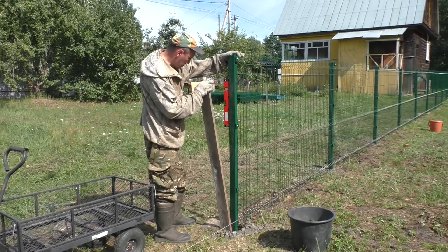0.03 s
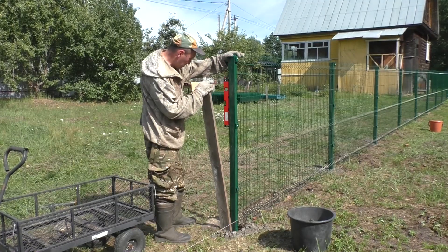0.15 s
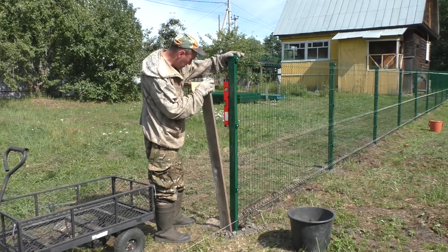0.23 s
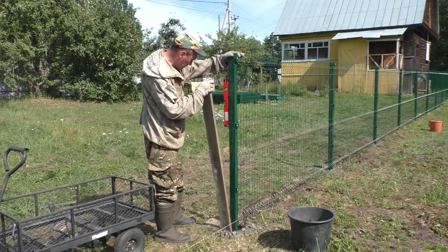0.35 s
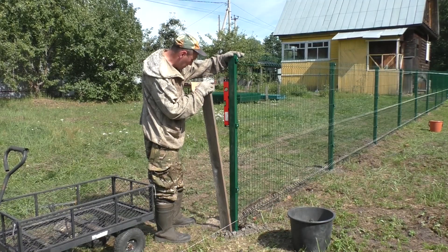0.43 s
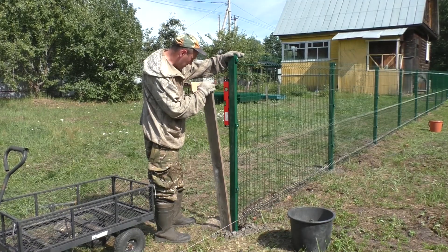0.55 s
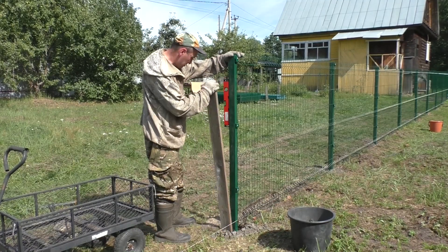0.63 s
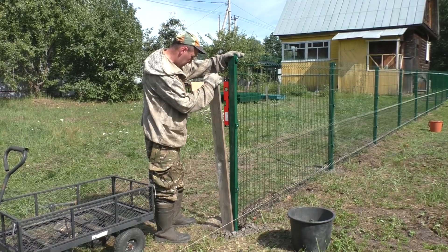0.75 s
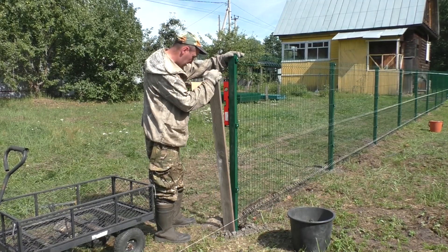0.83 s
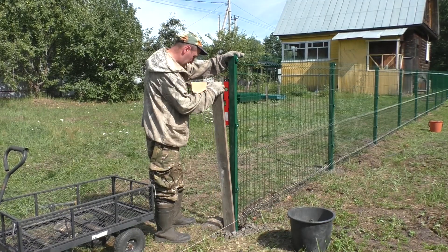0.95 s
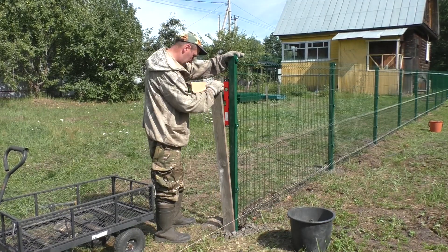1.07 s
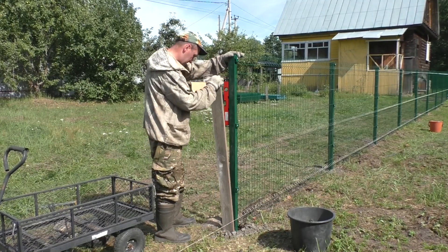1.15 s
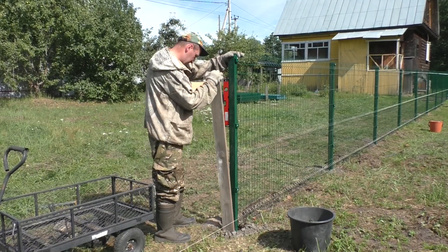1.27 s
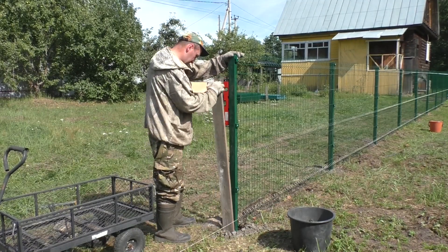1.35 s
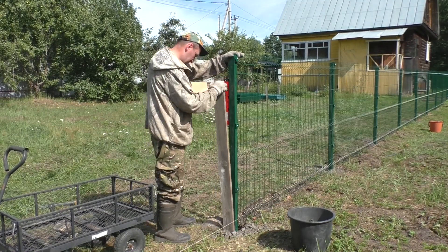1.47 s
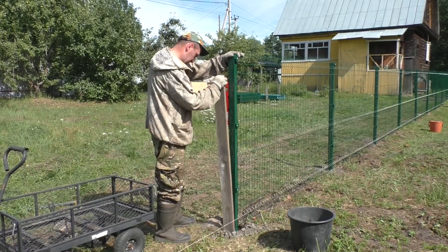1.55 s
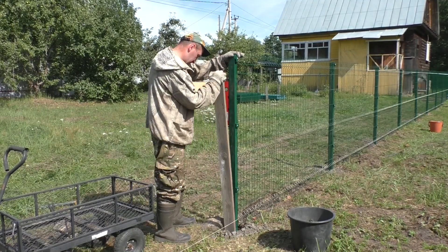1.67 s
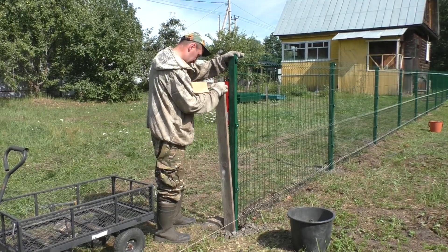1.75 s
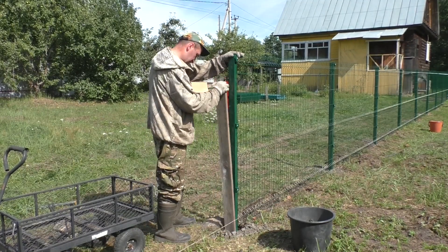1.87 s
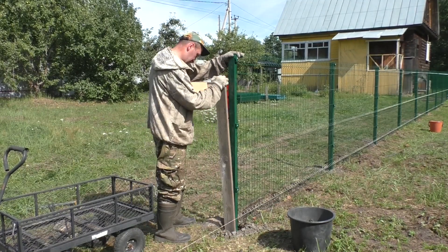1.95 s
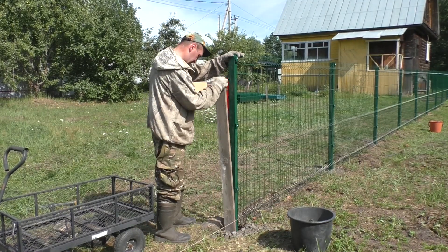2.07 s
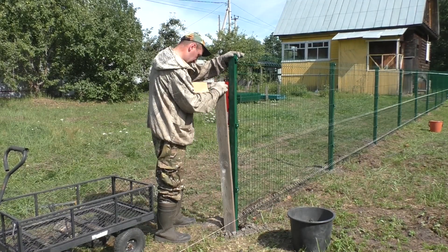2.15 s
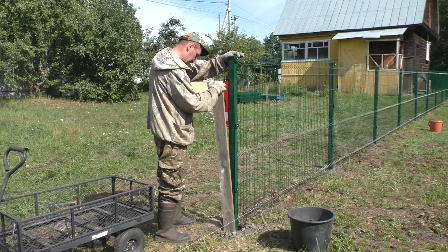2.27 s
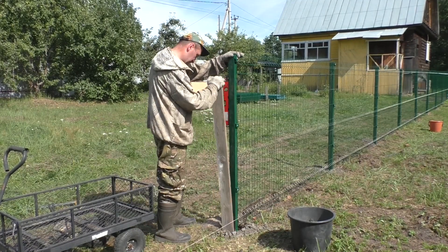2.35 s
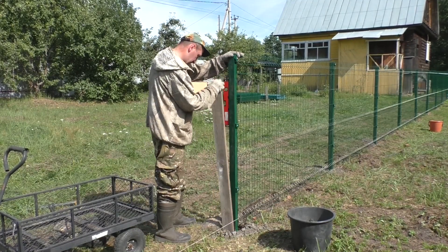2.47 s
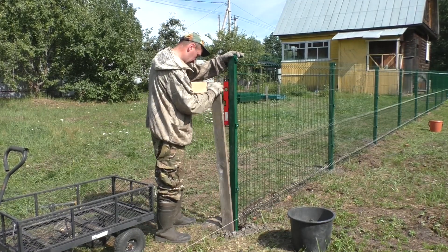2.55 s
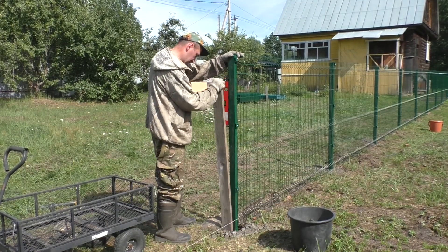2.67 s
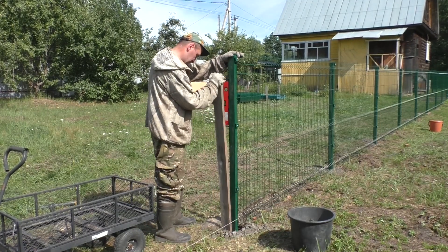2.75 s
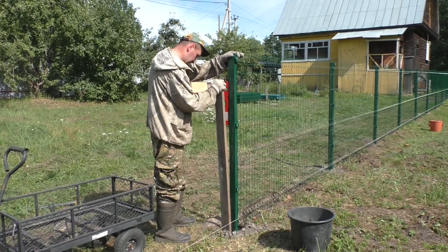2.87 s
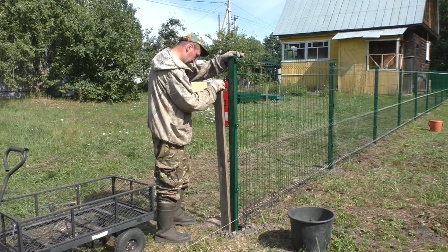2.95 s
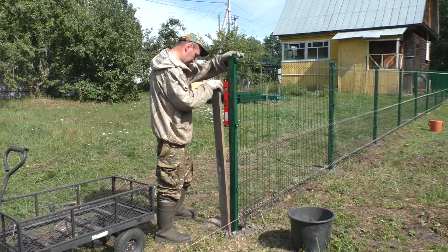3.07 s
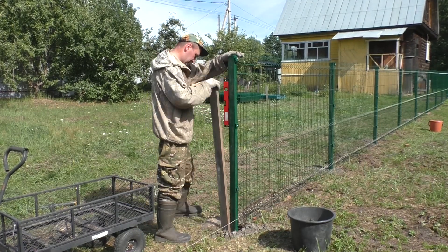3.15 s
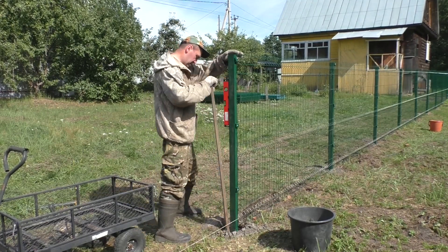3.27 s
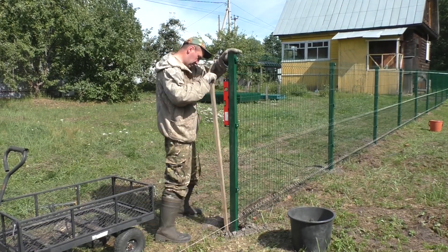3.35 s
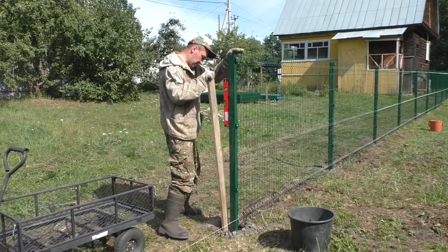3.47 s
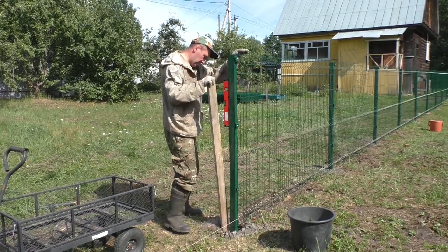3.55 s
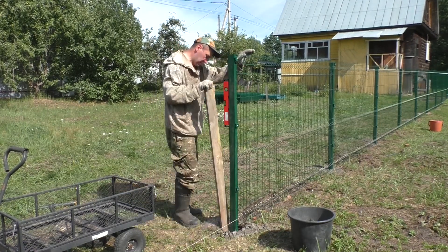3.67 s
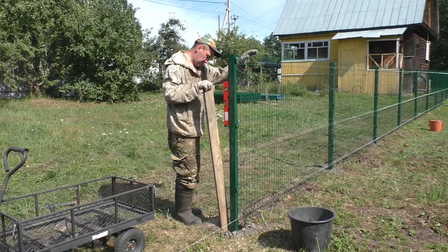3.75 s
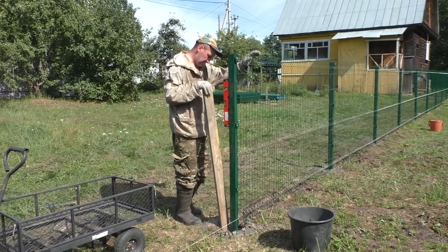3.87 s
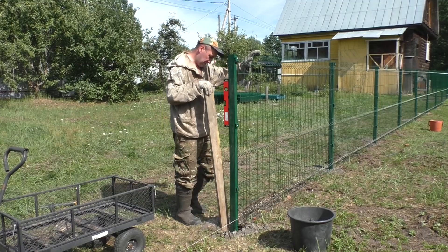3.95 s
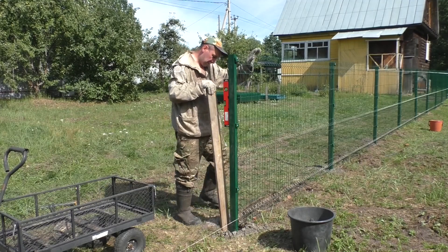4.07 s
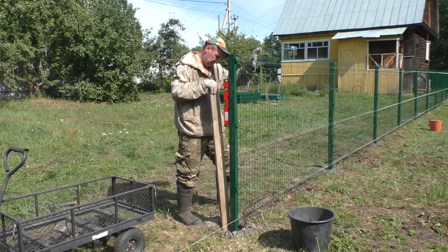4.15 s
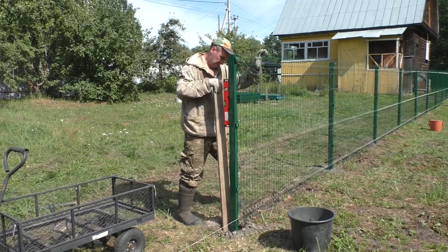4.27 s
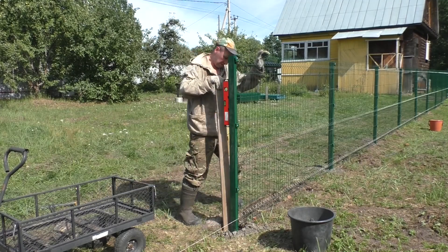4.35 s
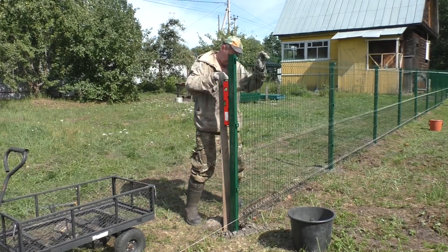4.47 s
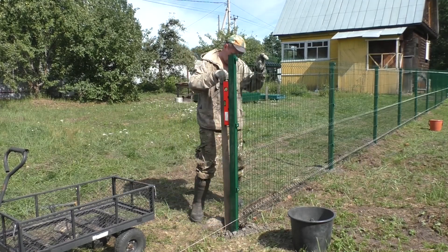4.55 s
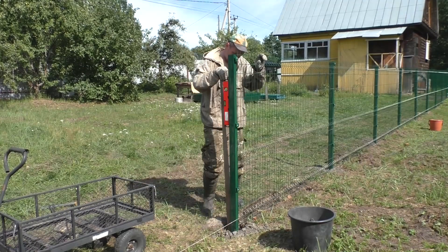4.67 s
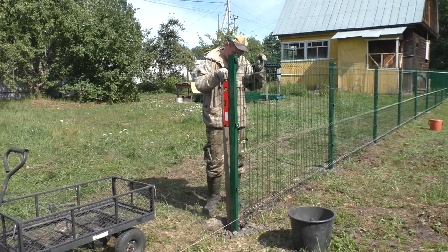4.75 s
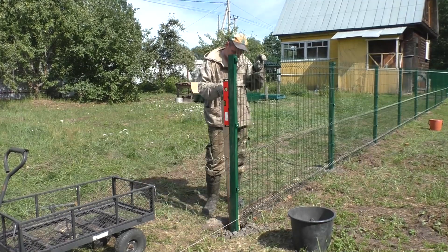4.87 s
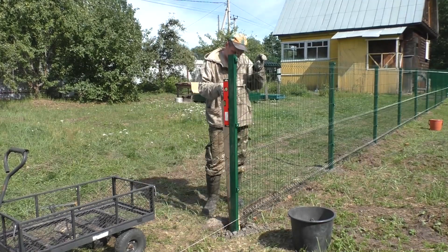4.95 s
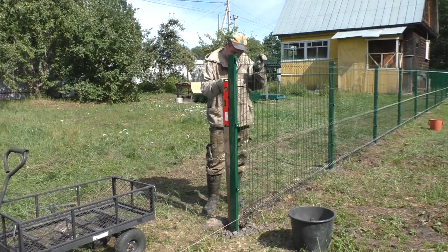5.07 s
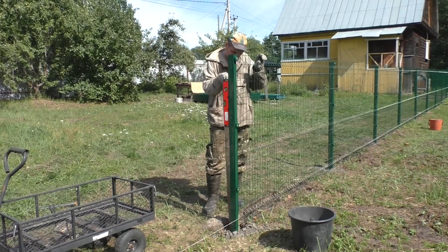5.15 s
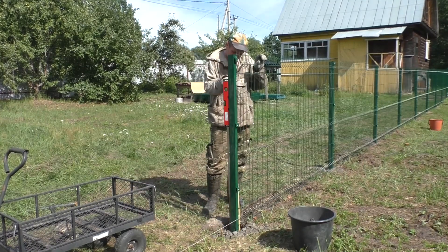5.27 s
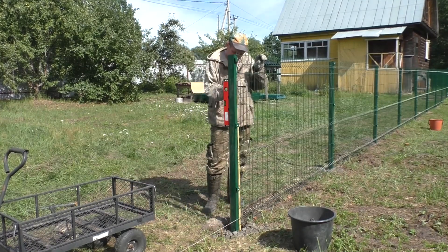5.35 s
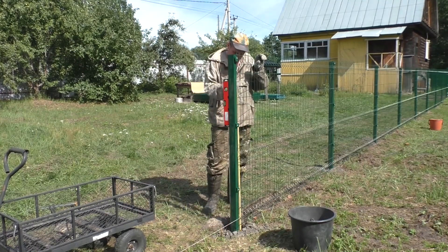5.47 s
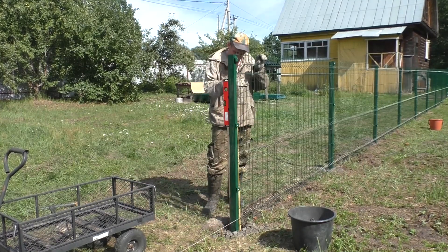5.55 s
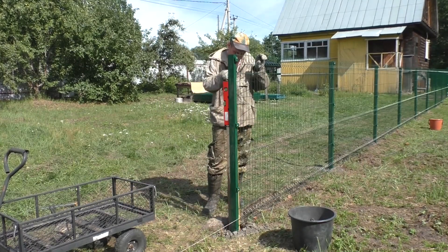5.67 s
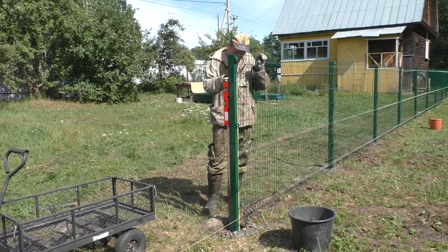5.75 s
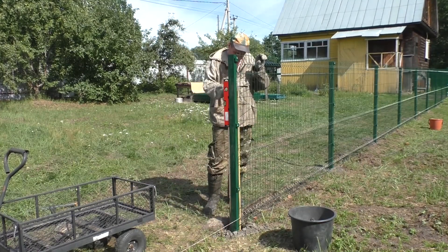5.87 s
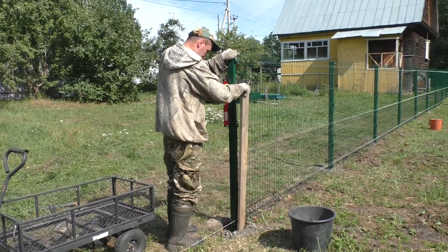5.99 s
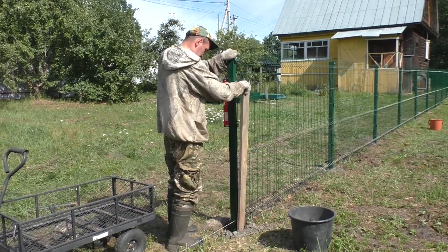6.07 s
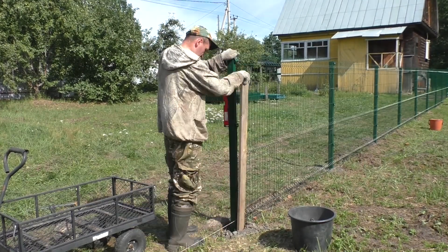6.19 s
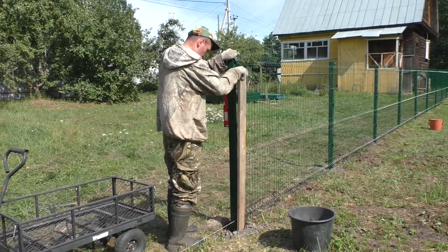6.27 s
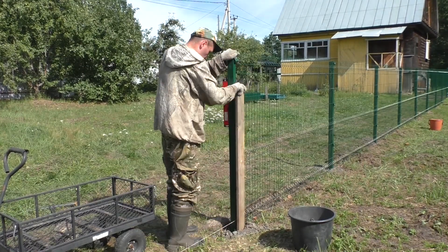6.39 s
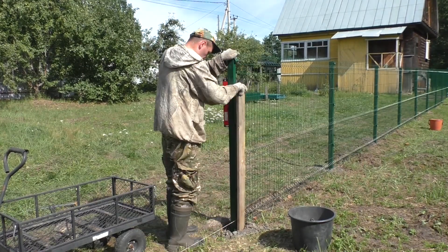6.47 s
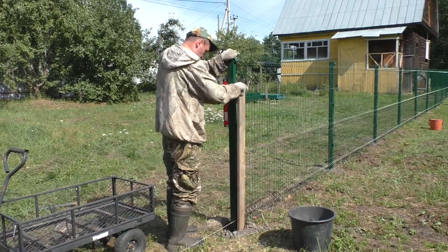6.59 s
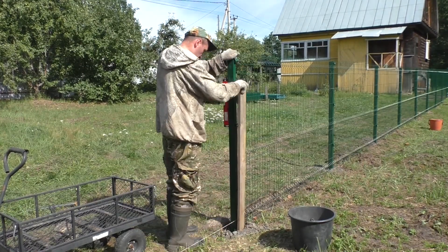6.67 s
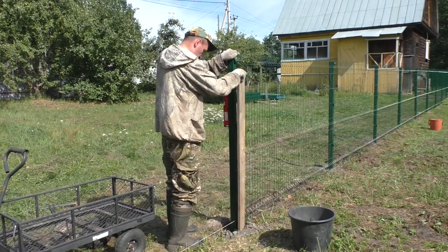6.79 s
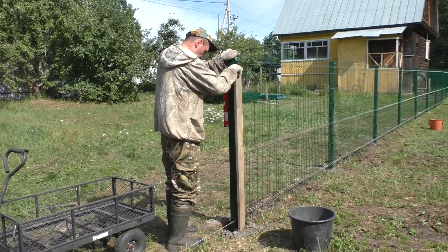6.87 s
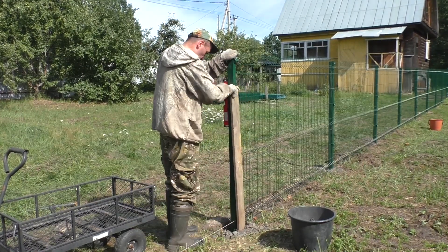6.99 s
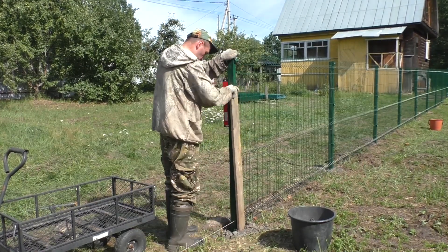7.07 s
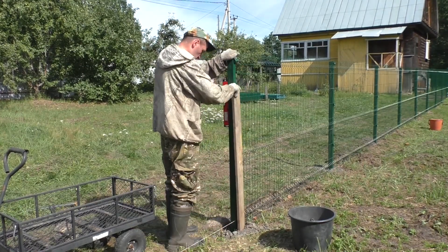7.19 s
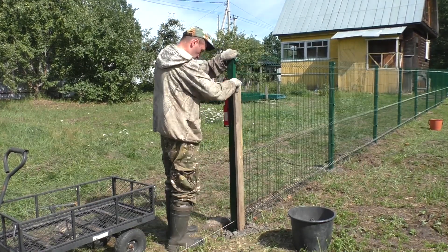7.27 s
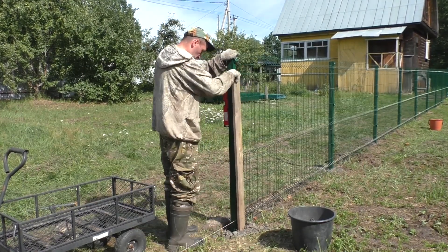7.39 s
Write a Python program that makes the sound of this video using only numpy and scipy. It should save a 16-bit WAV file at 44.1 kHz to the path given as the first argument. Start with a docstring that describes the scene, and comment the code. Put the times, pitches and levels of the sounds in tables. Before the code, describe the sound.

In a quiet garden, sharp knocks come in two runs as a board tamps stones and earth at the foot of a metal post. The wire fence jangles briefly with the hits, and soil crunches between them. Grasshoppers rasp faintly over leaves and a far rumble. During the second run, a little wind buffets the microphone.

```python
"""A garden: a long wooden board rams stony soil around a steel fence post, about twice a second with a pause.
The board knocks and grinds, stones crack, soil crunches, and each blow jolts the wire mesh on the post.
Behind lie a distant rumble, leaves in a breeze and grasshoppers; one late gust reaches the microphone.
The hardest blow turns a limiter's gain down, and it creeps back."""
import sys
import numpy as np
from scipy import signal
from scipy.fft import rfft, irfft, next_fast_len
from scipy.io import wavfile

SR = 44100
rng = np.random.default_rng(int(sys.argv[2]) if len(sys.argv) > 2 else 0)


def file_out(sig):
    """Save sig as 16-bit WAV at sys.argv[1]."""
    # one column per channel
    cols = np.atleast_2d(sig).T
    # limit, then scale
    lim = np.clip(cols, -1, 1)
    pcm = np.round(lim * 32767).astype(np.int16)
    wavfile.write(sys.argv[1], SR, pcm)


N = 327663
TIME = np.arange(N) / SR

# Spectra of far rumble, leaves, high hiss, wind on the microphone: freq_hz, relative_density_db
RUMBLE_SPECTRUM = [(20, -4.5), (45, -3.5), (85, -1), (120, -16.5), (165, -9), (220, -1.5), (330, -0.5),
                   (420, -3), (520, -8), (700, -10.5), (900, -14), (1400, -33)]
LEAF_SPECTRUM = [(500, -16), (780, -15.5), (1000, -2), (1300, -1.5), (1650, -1.5), (2100, -9.5),
                 (2800, -11.5), (3800, -17.5), (5200, -21), (8000, -14.5)]
HISS_SPECTRUM = [(3000, -22), (5400, -13), (6500, 1), (7500, 5.5), (9500, 7.5), (12000, 4.5), (13800, 7.5),
                 (16000, 3)]
WIND_SPECTRUM = [(20, -23), (55, 4), (100, -3.5), (160, -2.5), (240, -0.5), (400, -22), (800, -24)]
# Eddies at the microphone: centre_s, level_db, pitch_hz
EDDIES = [(6.125, -44.5, 72), (6.26, -41, 62), (6.43, -34, 94), (6.675, -38, 120), (6.985, -36, 94)]
# Grasshopper phrases: start_s, rise_s, end_s, level_db, resonance_hz, width_hz, throb_fraction
PHRASES = [(-.1, 0.12, 0.13, -59, 7160, 280, 0), (.9, 0.18, 2.8, -55, 7100, 700, 0.3),
           (1.9, 0.52, 2.6, -48, 7400, 900, 0.73), (2.3, .1, 2.6, -54.5, 7300, 200, 0.7),
           (2.1, 0.4, 3.53, -57.5, 7900, 470, 0), (5.8, 0.84, 7.6, -54, 7290, 248, 0.32)]
# High pings after some blows: start_s, level_db, t60_s
PINGS = [(1.425, -43, .3), (1.819, -50, .35), (2.186, -51, .3), (2.584, -48, .3), (2.914, -41, .3),
         (5.922, -30, 0.13)]
# Modes of mesh and post: pitch_hz, jolted_db, shaken_db, t60_s
MESH_MODES = [(903, -15.5, -3.5, 0.11), (968, -3, -6, 0.12), (1098, -6, -5.5, 0.12), (1172, -4.5, -2, 0.1),
              (1326, -3, -2, 0.029), (1378, -6, -4.5, 0.086), (1543, -1, -4, 0.05), (1661, -3, 0.5, 0.1),
              (1728, -2.5, -4, 0.092), (2040, -11.5, -6, 0.02), (2210, -15, -10, 0.071),
              (2450, -16, -20, 0.13), (2590, -8.5, -1, 0.1), (2670, -7.5, -1.5, 0.066),
              (2950, -6, -11, 0.027), (3120, -16, -17, 0.11), (3671, -28, -25, .08), (4700, -33, -17.5, .1)]
# Leaning on the post: start_s, level_db
LEANS = [(5.45, -46), (5.95, -42), (6.2, -46.5), (6.52, -42.5), (6.78, -43), (7.08, -34.5)]
# Boots and board scuffing soil: centre_s, half_width_s, level_db, fine_relative_db
SCUFFS = [(0.869, 0.0026, -39.5, -5), (.9, .03, -47, -7), (1.425, .0015, -23, 9), (2.557, 0.011, -39, -2),
          (2.619, .014, -37, -4), (2.677, 0.0055, -35.5, 1.5), (2.906, .012, -34, -2),
          (3.294, 0.033, -42.5, -2.5), (3.678, 0.0086, -28.5, -7.5), (3.766, 0.0074, -38, -11),
          (3.85, 0.0011, -30.5, -15), (4.5, .3, -57, -4), (4.895, 0.021, -48, -11),
          (4.953, 0.033, -32, -11), (5.383, 0.019, -37.5, -16), (5.49, .05, -44, -3),
          (6.013, .004, -37, -5.5), (6.072, 0.079, -39, -4.5), (6.424, 0.023, -31, -10.5),
          (6.58, .07, -42, -6), (7.023, 0.02, -25, -5.5), (7.062, 0.031, -21, -8), (7.226, 0.14, -38, -11)]
# Board end on stone: start_s, peak_db, pitch_hz, splinter_relative_db
STONE_SNAPS = [(1.0303, -8, 7700, -28), (1.4245, 7, 2770, -3.5), (1.811, -4, 6000, -12),
               (1.8184, 3, 3385, -6), (2.1864, 6.5, 4100, -5), (2.5656, -4, 3460, -6.5),
               (2.5851, -9, 3980, -3), (4.9239, -10.5, 7550, 0), (5.3929, 0.5, 2800, -12),
               (6.4408, 4.5, 3840, -6), (7.0662, -5.5, 3900, -3.5)]
# Board on ground or post: start_s, level_db, t60_s, bite_db, grit_db, low_hz, low_db, high_hz, high_db
# (low, high: two resonances; later levels relative to level_db)
BLOWS = [(1.0304, -14.5, 0.081, -1.5, -10, 1950, -3, 2663, 3.5),
         (1.4249, -12, 0.036, -5, -7.5, 1300, -5, 2460, -1),
         (1.808, -10.5, 0.04, -6, -6, 1435, -2.5, 2060, -7),
         (1.8196, -5, 0.013, -2, -6, 1840, -15, 2000, -1), (2.1839, -13, 0.015, 5, 0, 1176, 6.5, 1900, 7),
         (2.1867, -6, 0.014, -4, -6, 1300, 2, 3020, 5), (2.565, -8.5, 0.018, 0.5, -3, 1260, -2, 2400, -4),
         (2.5827, -9, 0.013, 5, -1.5, 1730, -17, 2990, 0),
         (2.723, -25, 0.034, -22, -23, 1426, -5, 1860, -2), (2.9124, -12, .021, 5, -1, 1350, -2, 2030, 4.5),
         (3.6802, -24, 0.085, 0.5, -12, 1640, 2.5, 2620, 5), (4.56, -47, .12, -14, -24, 1450, 9, 1990, -2),
         (4.922, -16.5, 0.077, -3, -6.5, 1642, 3.5, 1995, 1),
         (5.3878, -17.5, 0.056, -1.5, -25, 1900, -4, 2045, 4),
         (5.392, -15, 0.043, 5, -9, 1880, -11, 2845, 3.5),
         (5.8652, -12, 0.053, -2.5, -15.5, 1510, 0, 2260, 3.5),
         (5.879, -9, 0.024, -14, -19.5, 1530, 5, 1930, -12), (5.922, -27, 0.086, 1, 0, 1128, 1, 3280, 2),
         (6.4408, -6, .022, 3.5, -7.5, 1740, 8, 2650, -3),
         (7.0644, -7.5, 0.023, 1.5, -3.5, 1360, -1, 3085, 3.5)]


def from_db(db):
    """Decibels to gain."""
    return 10 ** (np.asarray(db) / 20)


def unit_rms(x):
    """Scale to rms 1."""
    return x / np.sqrt(np.mean(x ** 2) + 1e-20)


def band(x, low_hz, high_hz, order=2):
    """Causal band-pass."""
    sos = signal.butter(order, [low_hz, min(high_hz, .45 * SR)], "band", fs=SR, output="sos")
    return signal.sosfilt(sos, x + 1e-18)


def resonate(x, hz, width_hz):
    """Two-pole resonance, peak gain 1."""
    r = np.exp(-np.pi * width_hz / SR)
    poles = [1, -2 * r * np.cos(2 * np.pi * hz / SR), r * r]
    return signal.lfilter(np.array([1, 0, -1]) * (1 - r * r) / 2, poles, x + 1e-18)


def decay(t, t60_s):
    """Fall of 60 dB per t60_s."""
    return np.exp(-np.log(1000) * t / t60_s)


def swell(start_s, rise_s, end_s, t60_s):
    """Envelope: rise, hold until end_s, decay."""
    return np.clip((TIME - start_s) / rise_s, 0, 1) * decay(np.maximum(TIME - end_s, 0), t60_s)


def add(track, start_s, sound):
    """Mix a sound into a track."""
    start = int(start_s * SR)
    track[start:start + len(sound)] += sound[:N - start]


def drift(rate_hz):
    """Slow random curve, rms 1."""
    knots = rng.standard_normal(200)
    return unit_rms(np.interp(TIME * rate_hz, np.arange(len(knots)), knots))


def grains(per_s, spread_db):
    """Random clicks of uneven size and sign."""
    sizes = from_db(spread_db * np.minimum(rng.exponential(1, N), 4)) * rng.choice([-1, 1], N)
    return sizes * (rng.random(N) < per_s / SR)


def stereo_noise(spectrum, correlation):
    """Coloured noise, rms 1."""
    hz, db = np.transpose(spectrum)
    size = next_fast_len(N)
    bins_hz = np.arange(size // 2 + 1) * SR / size
    gain = from_db(np.interp(np.log(bins_hz + 1), np.log(hz), db, left=-60, right=-80))
    mid, side = irfft(rfft(rng.standard_normal((2, size))) * gain, size)[:, :N]
    return unit_rms(np.sqrt(1 + correlation) * mid + np.sqrt(1 - correlation) * side * [[1], [-1]])


def garden_air(gust, lift_db=6):
    """Far rumble, fluttering leaves and high hiss, lifted by the gust."""
    rumble = from_db(-50.5 + lift_db * gust) * stereo_noise(RUMBLE_SPECTRUM, 0.88)
    leaves = from_db(-53 + lift_db * gust + 2.4 * drift(9.2)) * stereo_noise(LEAF_SPECTRUM, 0.76)
    hiss = from_db(-56.5 + .6 * gust) * stereo_noise(HISS_SPECTRUM, 1.0)
    return rumble + leaves + hiss


def microphone_wind(gust, eddy_s=0.021):
    """The gust rumbles on the ports, harder on the right; eddies rock the diaphragms out of step."""
    out = gust * from_db(-44.5 + 2.0 * drift(22)) * stereo_noise(WIND_SPECTRUM, .55)
    for centre_s, db, hz in EDDIES:
        phase = rng.uniform(0, 2 * np.pi) + rng.normal(0, 0.73, (2, 1))
        envelope = from_db(db) * np.exp(-((TIME - centre_s) / eddy_s) ** 2)
        out += envelope * np.sin(2 * np.pi * hz * TIME + phase)
    return out * from_db([[-1.1], [1.1]])


def wing_rasp(hz, width_hz, upper_db):
    """A leg's teeth scrape a wing with two resonances."""
    teeth = rng.standard_normal(N)
    wing = resonate(teeth, hz, width_hz) + from_db(upper_db) * resonate(teeth, 1.194 * hz, 1200)
    return unit_rms(band(wing, 7340, 10500))


def grasshoppers(strokes_per_s=49.3, chorus_db=-65):
    """A far chorus and single phrases, some throbbing with each leg stroke."""
    strokes = unit_rms(.1 + np.sin(np.pi * strokes_per_s * TIME) ** 4)
    out = from_db(chorus_db) * wing_rasp(hz=7440, width_hz=400, upper_db=-13)
    for start_s, rise_s, end_s, db, hz, width_hz, throb in PHRASES:
        envelope = from_db(db) * swell(start_s, rise_s, end_s, t60_s=.4)
        pulsing = 1 + throb * (strokes - 1)
        out += envelope * pulsing * wing_rasp(hz, width_hz, upper_db=-12.5)
    return out


def echoes(x, wall_s=.0285, wall_spread_s=0.0049, house_s=0.083):
    """A rough near reflection, stereo scatter from trees, a later wash from the house."""
    t = TIME[:SR // 2]
    wall = band(rng.standard_normal(len(t)), 700, 8000, order=1)
    wall *= np.exp(-((t - wall_s) / wall_spread_s) ** 2)
    mid, side = band(rng.standard_normal((2, len(t))), 942, 5300) * decay(t, t60_s=1.0)
    trees = mid + side * [[1], [-1]]
    house = band(rng.standard_normal(len(t)), 1530, 8000, order=1) * (t > house_s) * decay(t, t60_s=0.83)
    response = (from_db(-28) * wall / np.linalg.norm(wall)
                + from_db(-30) * trees / np.linalg.norm(trees[0])
                + from_db(-27.5) * house / np.linalg.norm(house))
    return signal.fftconvolve(x[None], response, axes=1)[:, :N]


def ground_reflection(x, delay_s=.0012, level_db=-22):
    """A bounce off the ground, opposite in sign left and right."""
    delayed = np.interp(TIME - delay_s, TIME, x)
    return from_db(level_db) * band(delayed, 150, 8060, order=1) * [[1], [-1]]


def pings(pitch_hz=13577):
    """A faint, very high ring after some blows."""
    out, t = np.zeros(N), TIME[:SR // 2]
    for start_s, db, t60_s in PINGS:
        add(out, start_s, from_db(db) * np.sin(2 * np.pi * pitch_hz * t) * decay(t, t60_s))
    return out


def fence(jangle_t60_s=0.6, lean_rise_s=0.063, lean_t60_s=1.82, strike_db=3, chatter_db=-8):
    """Blows and leaning ring the mesh's modes and set the wires chattering against their clamps."""
    jolt_power, strikes, out = np.zeros((3, N))
    for start_s, db, contact_t60_s, *_ in BLOWS:
        jolt = from_db(db + 6) * contact_t60_s  # strength times duration
        add(jolt_power, start_s, (jolt * decay(TIME[:SR], jangle_t60_s)) ** 2)
        add(strikes, start_s, jolt * from_db([strike_db]))
    jolts = np.sqrt(jolt_power)
    leans = [from_db(db) * swell(s, lean_rise_s, s + lean_rise_s, lean_t60_s) for s, db in LEANS]
    shake = np.linalg.norm(leans, axis=0)
    mode_norm = np.linalg.norm(from_db(np.array(MESH_MODES)[:, 1]))
    for hz, jolted_db, shaken_db, t60_s in MESH_MODES:
        width_hz = np.log(1000) / (np.pi * t60_s)
        makeup = np.sqrt(SR / (np.pi * width_hz))  # a narrow mode passes little of a click
        motion = np.hypot(from_db(jolted_db) * jolts, from_db(shaken_db) * shake)
        taps = unit_rms(grains(per_s=500, spread_db=1.5)) * motion
        drive = taps * makeup + from_db(jolted_db) * strikes * makeup ** 2 / 2
        out += resonate(drive, hz, width_hz) / mode_norm
    chatter = unit_rms(band(grains(per_s=2500, spread_db=2.0), 820, 4230, order=3))
    return out + from_db(chatter_db) * np.hypot(shake, jolts) * chatter


def soil(dust_db=-4):
    """Crumbs break in dense clicks under each scuff: coarse ones lower, fine ones higher."""
    coarse, fine = np.zeros((2, N))
    for centre_s, half_width_s, db, fine_db in SCUFFS:
        push = from_db(db) * np.exp(-2 * np.minimum(((TIME - centre_s) / half_width_s) ** 2, 20))
        coarse += push
        fine += from_db(fine_db) * push
    crumbs = grains(per_s=6000, spread_db=2.5)
    sand = unit_rms(band(crumbs, 3960, 6600)) + from_db(dust_db) * unit_rms(band(crumbs, 8000, 11800))
    return coarse * unit_rms(band(crumbs, 930, 3350, order=3)) + fine * sand


def stones(width_ratio=0.64, push_db=-27):
    """A hard contact: one heavily damped click, a bright splinter above, a dull push below."""
    out, click = np.zeros(N), signal.unit_impulse(SR // 20)
    push = band(click, 24.7, 220, order=1)
    splinter = band(resonate(click, hz=10500, width_hz=3500), 4070, 13320, order=1)
    for start_s, db, hz, splinter_db in STONE_SNAPS:
        snap = band(resonate(click, hz, hz * width_ratio), 740, 1.21 * hz, order=1)
        contact = snap / np.abs(snap).max() + from_db(push_db) * push / push.max()
        add(out, start_s, from_db(db) * contact)
        add(out, start_s, from_db(db + splinter_db) * splinter / np.abs(splinter).max())
    return out


def board(rise_s=0.00074, thud_db=-14, ring_db=-2, ring_t60_ratio=1.2):
    """Each blow is a dying burst of grinding in four bands; where it lands sets the two resonances."""
    out, t = np.zeros(N), TIME[:SR // 4]
    bands_hz = [(150, 470), (1000, 2320), (2050, 4410), (5200, 10100)]
    for start_s, level_db, t60_s, bite_db, grit_db, low_hz, low_db, high_hz, high_db in BLOWS:
        onset = 1 - np.exp(-t / rise_s)
        envelope = onset * decay(t, t60_s)
        envelope_rms = np.sqrt(np.mean(envelope ** 2))
        for (bottom_hz, top_hz), db in zip(bands_hz, (thud_db, 0, bite_db, grit_db)):
            slips = unit_rms(band(rng.standard_normal(len(t)), bottom_hz, top_hz))
            grind = np.tanh(2 * slips)  # the sharpest slips saturate
            burst = unit_rms(band(grind * envelope, bottom_hz * 0.8, top_hz * 1.25))
            add(out, start_s, from_db(level_db + db) * burst * envelope_rms)
        for hz, db in ((low_hz, low_db), (high_hz, high_db)):
            ring = np.sin(2 * np.pi * hz * t) * onset * decay(t, t60_s * ring_t60_ratio)
            add(out, start_s, from_db(level_db + db + ring_db) * ring)
    return out


def reduction_db(level_db, threshold_db, release_db_per_s, attack_s):
    """Excess over the threshold, taken up quickly and released at a steady rate."""
    excess_db = np.maximum(level_db - threshold_db, 0)
    ramp_db = release_db_per_s * TIME
    held_db = np.maximum.accumulate(excess_db + ramp_db) - ramp_db
    pole = np.exp(-1 / (attack_s * SR))
    return signal.lfilter([1 - pole], [1, -pole], held_db)


def scene():
    """The work at the post, its reflections and the garden."""
    work = board() + stones() + soil() + fence() + pings()
    reflections = ground_reflection(work) + echoes(work)
    gust = swell(start_s=5.954, rise_s=0.26, end_s=6.83, t60_s=3)
    return work + reflections + garden_air(gust) + microphone_wind(gust) + grasshoppers()


def record(dry, duck_slope=0.37, cutoff_hz=16200):
    """Slow-release limiter, brief ducking on loud blows, clipping, low-pass."""
    peak_db = 20 * np.log10(np.abs(dry).max(0) + 1e-9)
    limit_db = reduction_db(peak_db, threshold_db=2.5, release_db_per_s=1.05, attack_s=.0001)
    limited = dry * from_db(-limit_db)
    level_db = 10 * np.log10(signal.lfilter([.01], [1, -.99], limited.mean(0) ** 2) + 1e-12)
    excess_db = reduction_db(level_db, threshold_db=-21.5, release_db_per_s=168, attack_s=0.026)
    ducked = limited * from_db(-duck_slope * excess_db)
    low_pass = signal.ellip(10, .1, 70, cutoff_hz, fs=SR, output="sos")
    return signal.sosfilt(low_pass, np.clip(ducked, -1, 1))


dry = scene()
out = record(dry)
file_out(out)
```